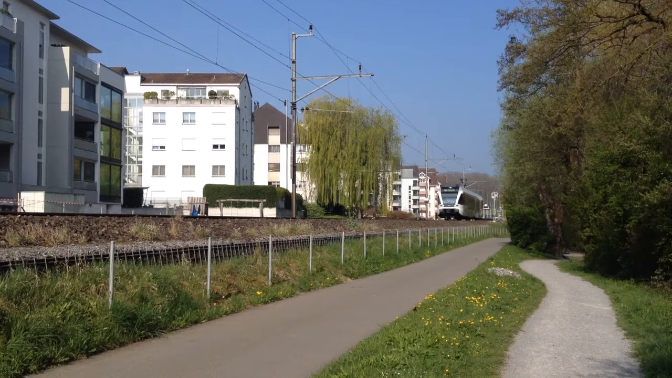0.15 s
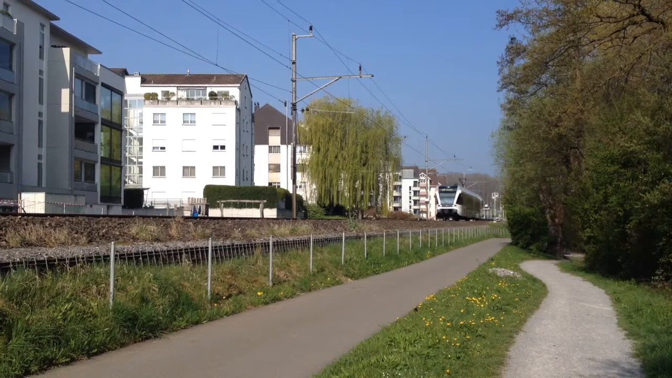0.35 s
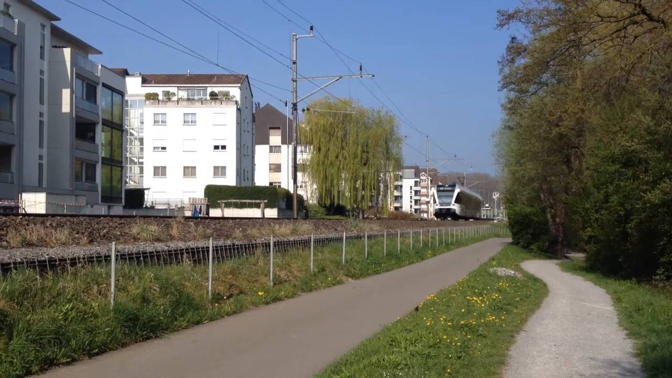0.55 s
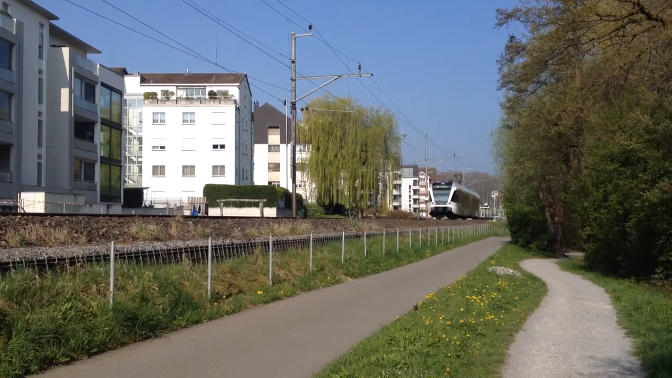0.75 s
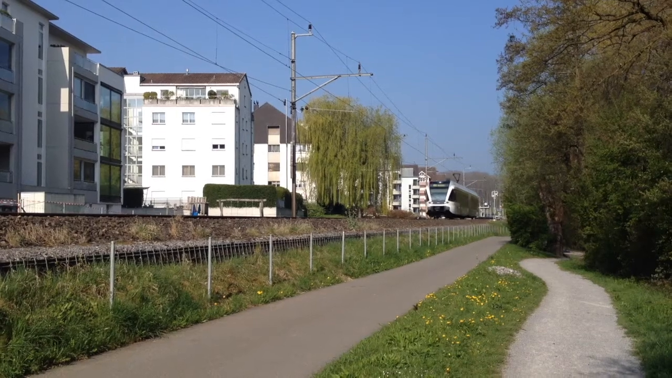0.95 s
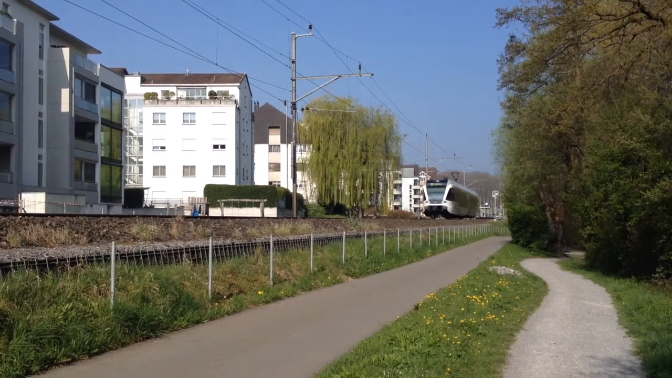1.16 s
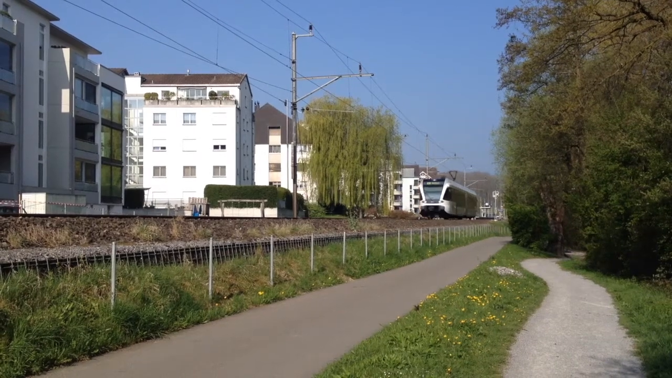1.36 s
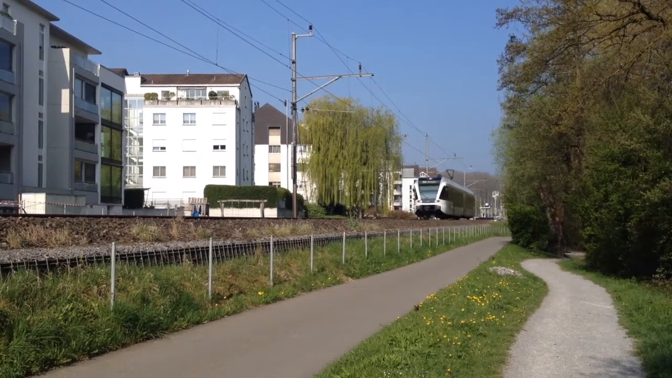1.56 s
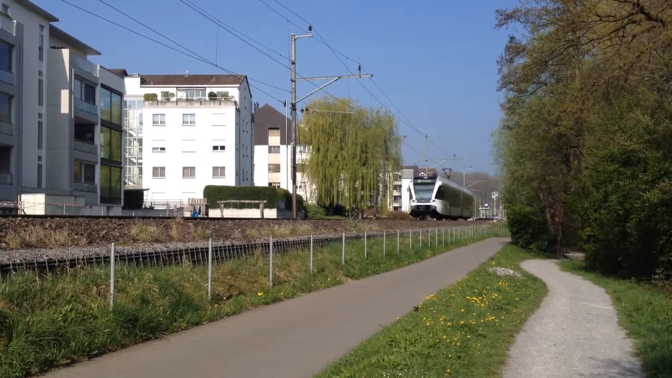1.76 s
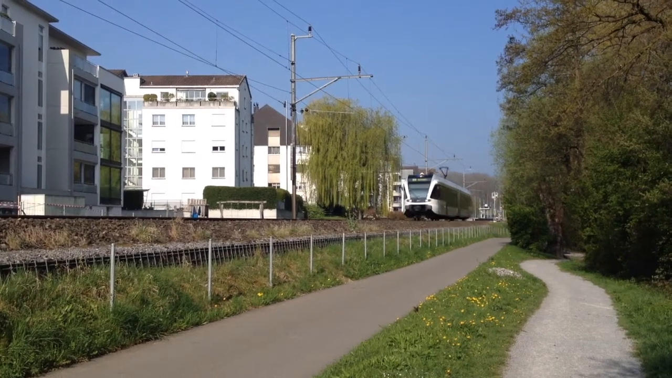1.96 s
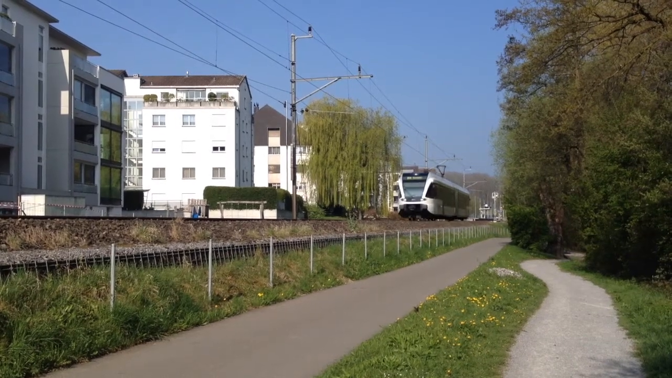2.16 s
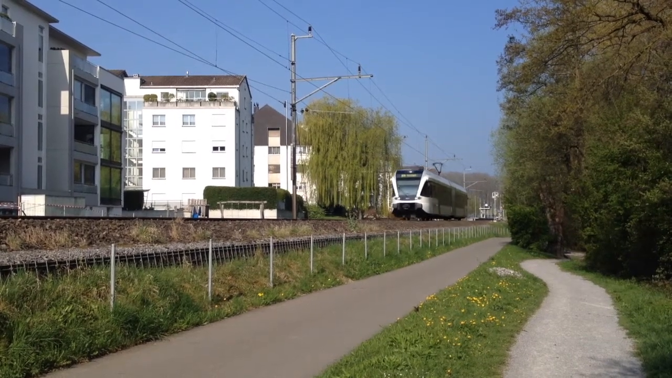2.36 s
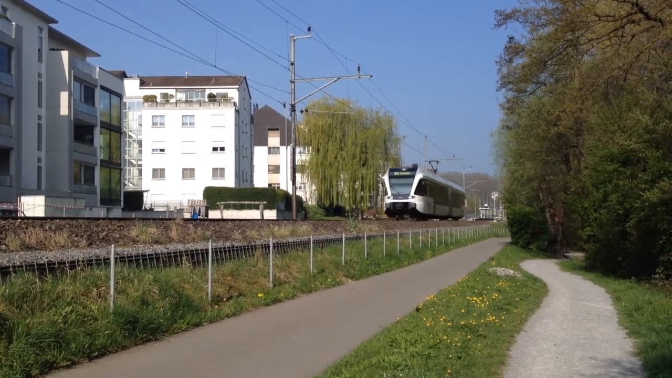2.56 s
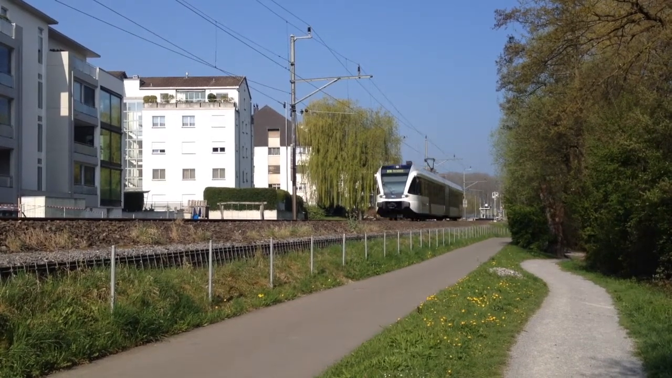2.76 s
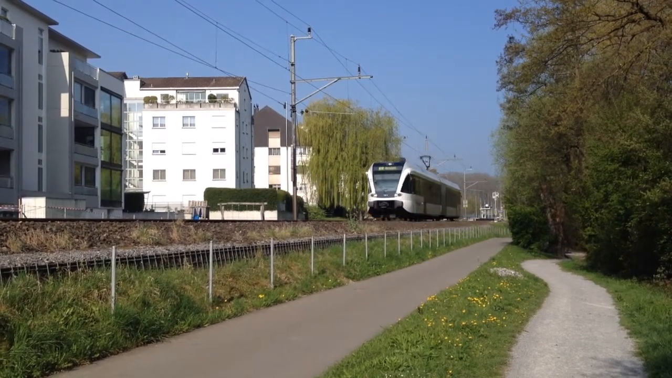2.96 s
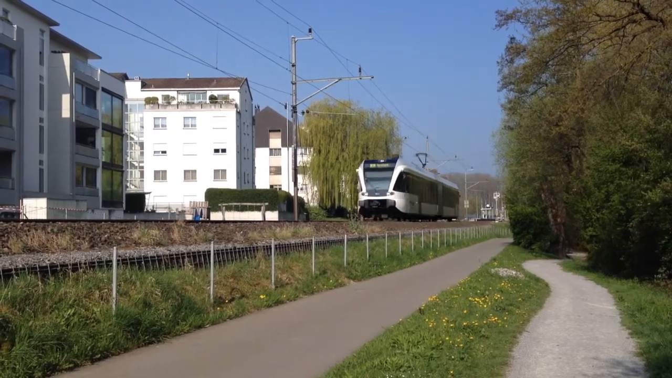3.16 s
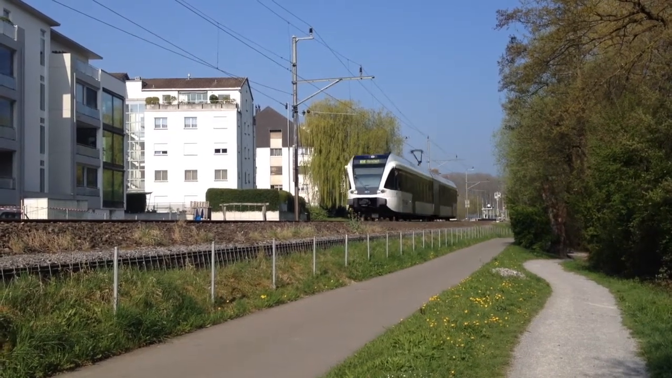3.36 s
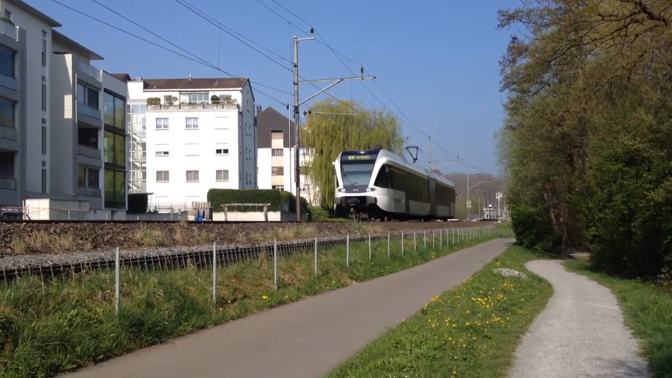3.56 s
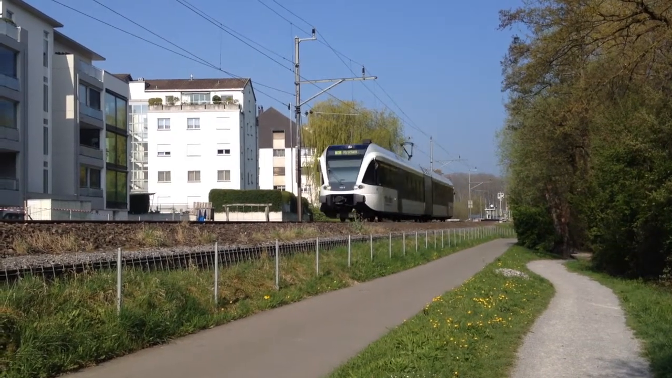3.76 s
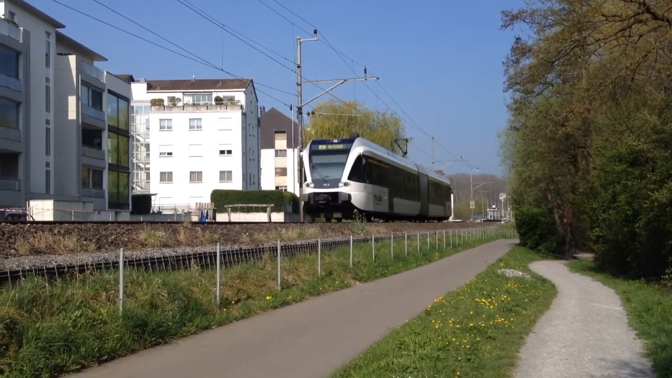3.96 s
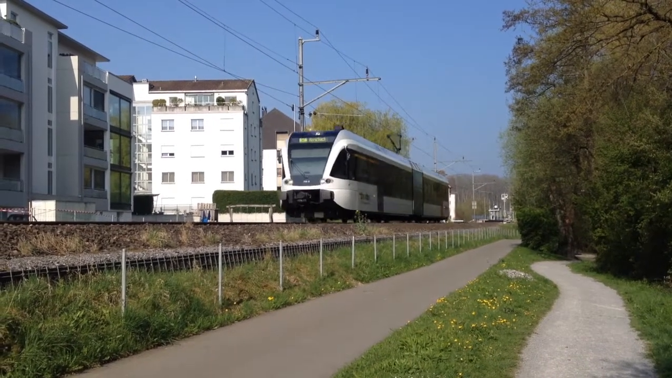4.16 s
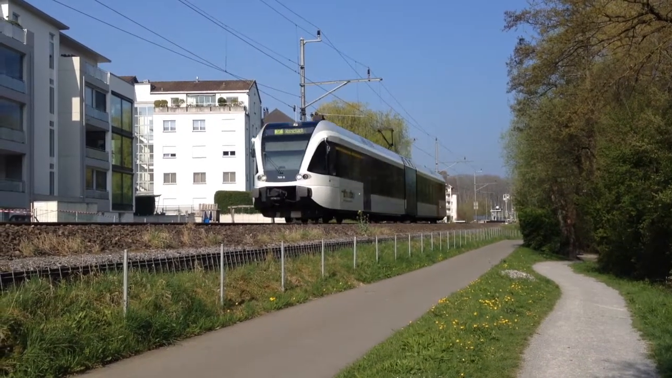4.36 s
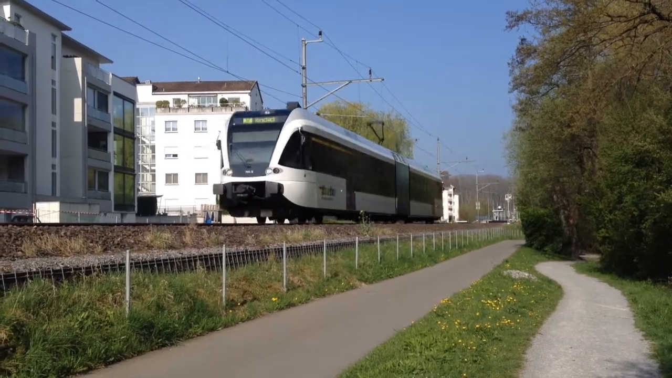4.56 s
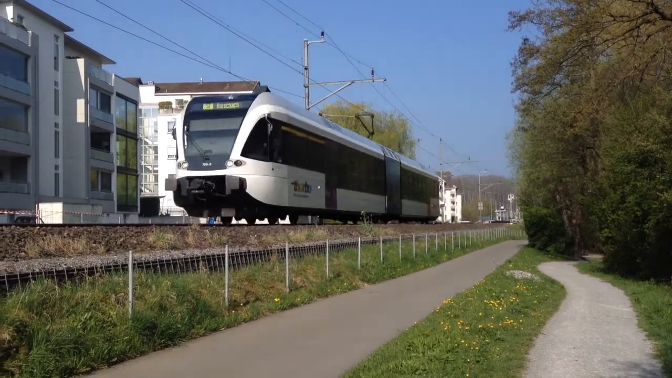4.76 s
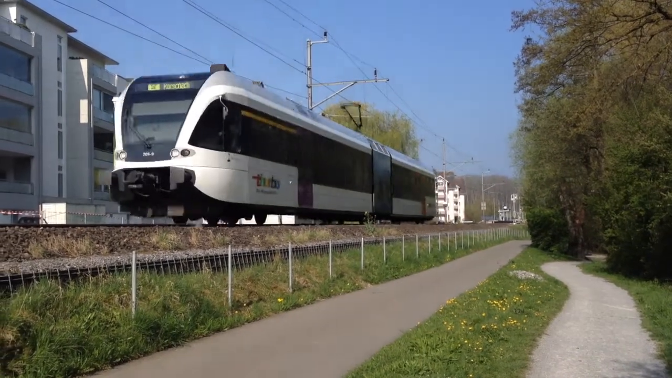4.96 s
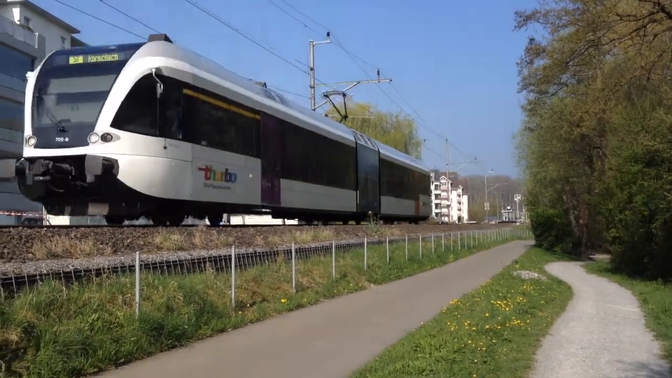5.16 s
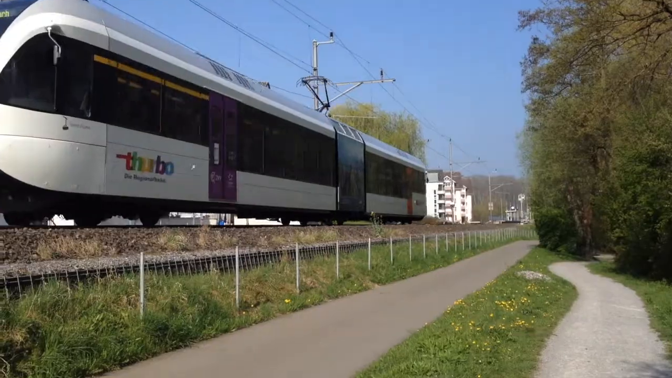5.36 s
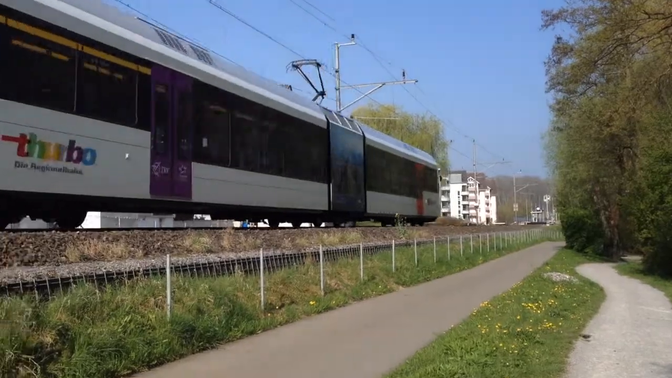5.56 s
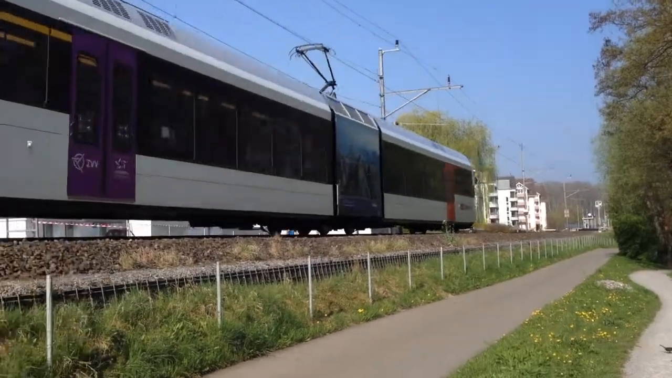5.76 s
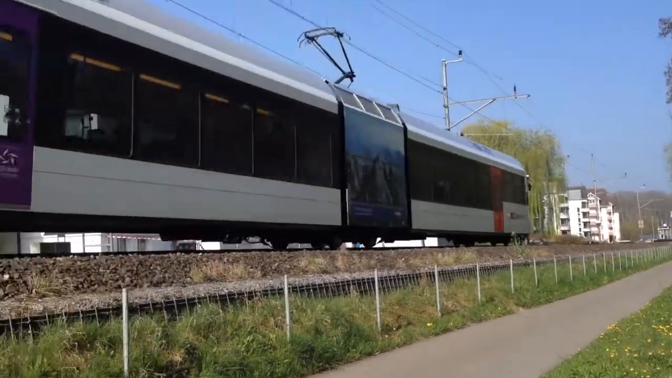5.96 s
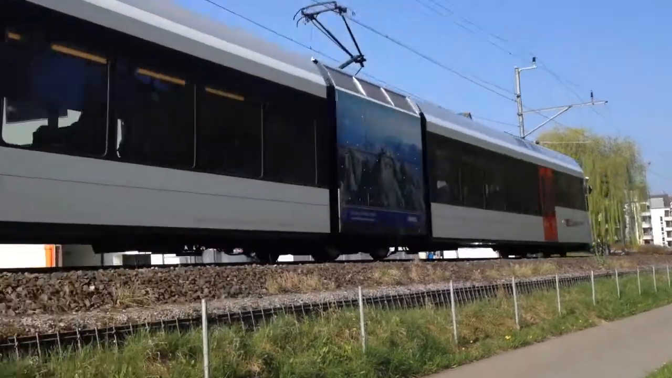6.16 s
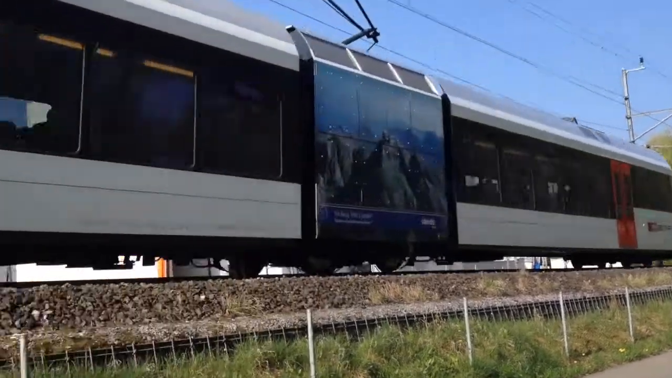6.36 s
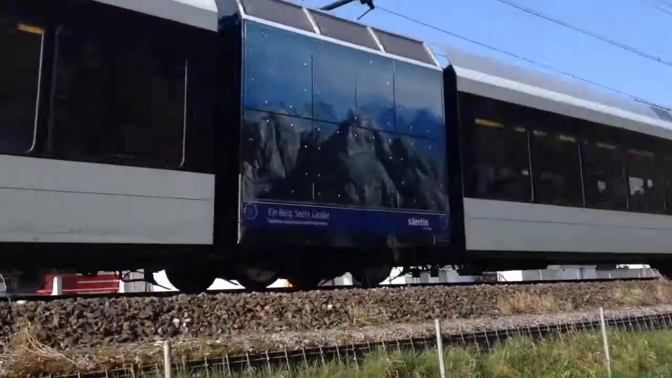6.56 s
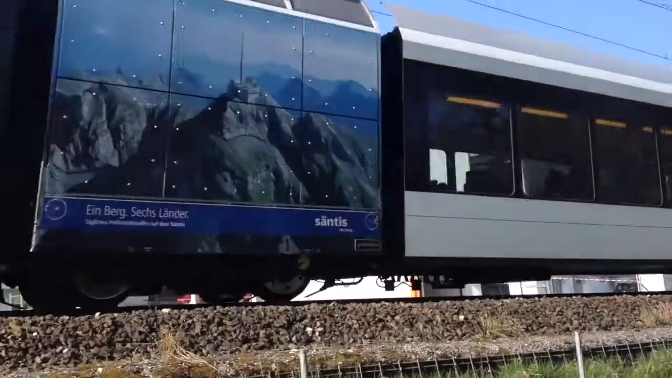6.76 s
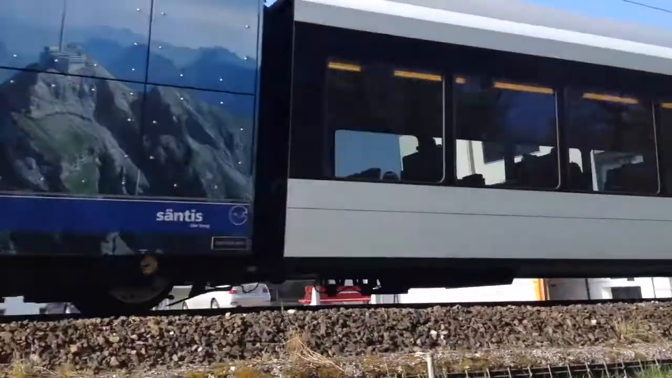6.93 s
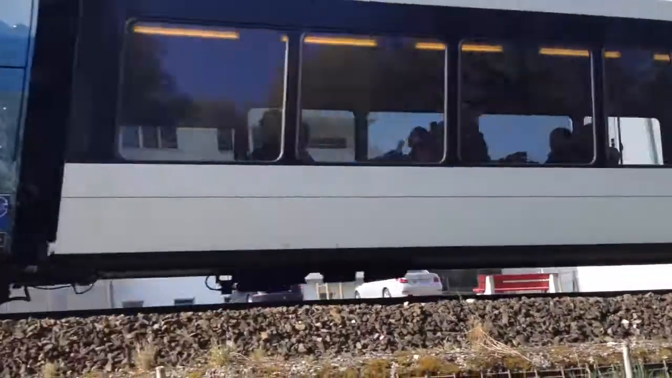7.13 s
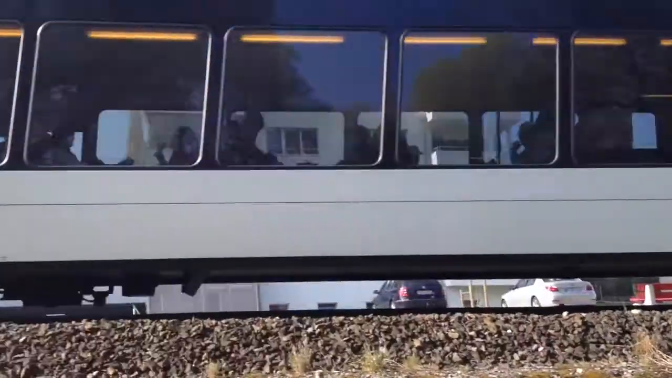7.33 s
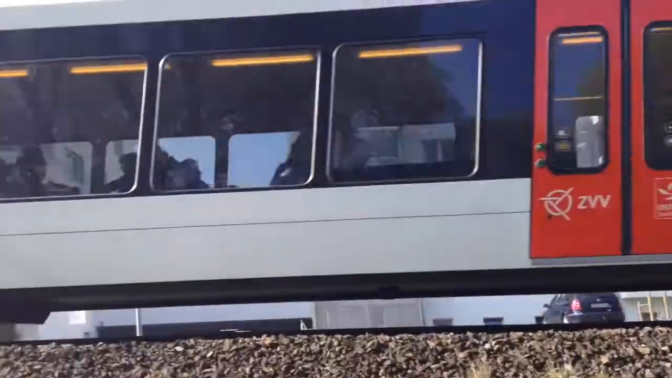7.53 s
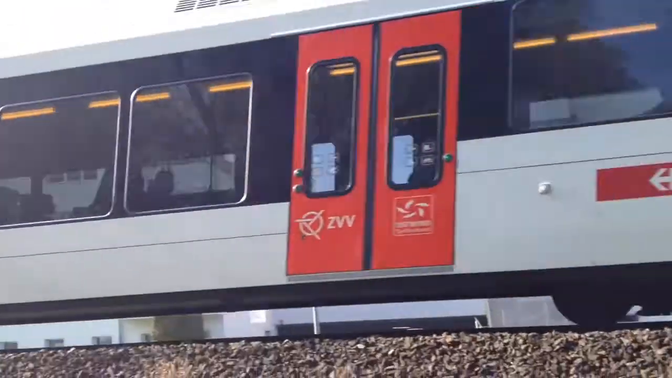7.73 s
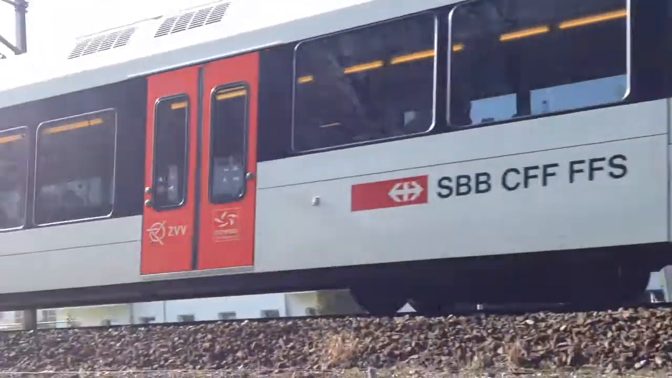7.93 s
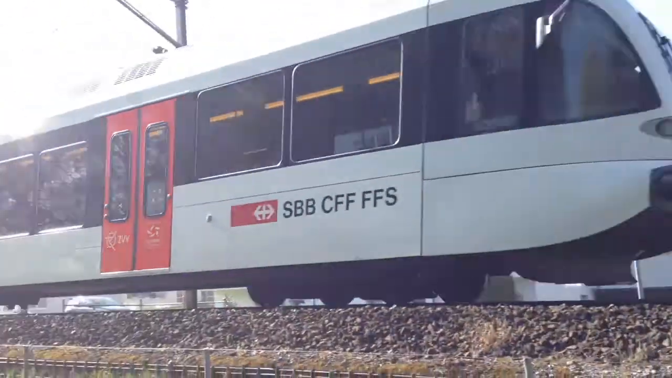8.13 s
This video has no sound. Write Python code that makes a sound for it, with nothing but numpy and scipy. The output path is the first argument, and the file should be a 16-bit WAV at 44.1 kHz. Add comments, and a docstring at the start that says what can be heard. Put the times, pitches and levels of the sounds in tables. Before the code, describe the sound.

A light electric railcar swells from a faint hiss to a close, ringing steel-on-rail roar as small birds chirp before it arrives.

```python
"""An electric railcar nears and rolls past a few metres away; small birds call over a faint town hush.
Roar is coloured noise in flickering bands plus track resonances; wheels ring in narrow Doppler-shifted modes.
Motor and gear tones follow a mostly rising pitch curve; a rail joint knocks; squeaks and birds are gliding notes.
Both channels carry the same mono sound."""
import sys
import numpy as np
from scipy import signal
from scipy.fft import rfft, irfft, next_fast_len
from scipy.io import wavfile
from scipy.ndimage import uniform_filter1d

SR = 44100
rng = np.random.default_rng(int(sys.argv[2]) if len(sys.argv) > 2 else 0)


def master_out(mix):
    """Clip the mix to full scale and print it as 16-bit PCM to the path in sys.argv[1]."""
    frames = np.transpose(np.atleast_2d(mix))
    ceiling = np.clip(frames, -1, 1)
    pcm = np.round(ceiling * 32767).astype(np.int16)
    wavfile.write(sys.argv[1], SR, pcm)


N = 365740
TIME = np.arange(N) / SR
SPEED_MS, TRACK_M, SOUND_MS = 17.5, 7.5, 343  # constant passing speed, distance at the nearest point
NOSE_S, NOSE_RISE_S = 5.6, 0.412  # the nose comes abreast
RING_SINK_PER_S = 0.0396  # pitch share lost per second of ring once close

# nominal rolling roar: [t/s, level/dB in 1700-9000 Hz, relative body/dB, relative rumble/dB]
ROAR_CURVE = [(.1, -65, -3, -4), (.5, -65.5, -1.5, -6), (1.2, -62.5, -2, -3), (1.9, -60.5, 2.5, -1.5),
              (3, -57, 0.5, -1), (4, -51.5, 0, 2.5), (4.75, -45, -3.5, 3.5), (5.2, -41.5, -3, 4.5),
              (5.32, -41, -0.5, 5.5), (5.55, -37.5, -0.5, 4), (6.03, -35.5, 1.5, 2), (6.5, -34, 2, -0.5),
              (7.1, -33.5, 2.5, -4), (7.35, -33.5, 1, 2), (7.6, -33.5, 0, 1), (7.75, -32.5, -1.5, 1.5),
              (8.05, -34, -1.5, 0), (8.29, -38, 2.5, 1)]
# spectral density of the roar: [f/Hz, relative level/dB per Hz]
ROAR_SPECTRUM = [(40, -29), (130, -4.5), (360, -9), (480, -5), (660, -4.5), (760, -10.5), (1000, -6.5),
                 (1800, -11.5), (2300, -8.5), (4500, -6.5), (5050, -13.5), (7200, -12.5), (8600, -23.5),
                 (15200, -50.5)]


def undb(db):
    """Decibels to amplitude gain."""
    return 10 ** (np.asarray(db) / 20)


def unit(x):
    """Scale to rms 1."""
    return x / np.sqrt(np.mean(x ** 2))


def columns(table):
    """Value columns of a time curve, interpolated at every sample."""
    s, *values = np.transpose(table)
    return [np.interp(TIME, s, value) for value in values]


def on_log_hz(hz, table_hz, table_db):
    """Level curve in dB, linear over log frequency."""
    return np.interp(np.log(hz), np.log(table_hz), table_db)


def highpass(x, hz):
    """Second-order Butterworth high-pass."""
    return signal.sosfilt(signal.butter(2, hz, "high", fs=SR, output="sos"), x)


def walk(rate_hz, size=N):
    """Random levels held 1 / rate_hz, smoothed by two moving averages; spread near 1."""
    hold = int(SR / rate_hz)
    steps = np.repeat(rng.standard_normal(size // hold + 1), hold)
    smooth = uniform_filter1d(uniform_filter1d(steps, hold), hold)
    return 1.35 * smooth[:size]


def sine(hz):
    """Clean tone on the pitch track hz; rms 1."""
    return np.sqrt(2) * np.sin(2 * np.pi * np.cumsum(hz) / SR)


def hum(hz, width_hz):
    """Narrow-band noise on the pitch track hz: size and phase wander over width_hz; rms near 1."""
    phase = 2 * np.pi * np.cumsum(hz) / SR
    in_phase = walk(2 * width_hz, size=len(hz)) * np.cos(phase)
    return in_phase + walk(2 * width_hz, size=len(hz)) * np.sin(phase)


def ring(hz, rough):
    """A smooth ring holds a clean tone; a rough one spreads into a wavering cluster."""
    clean = np.sqrt(max(1 - rough ** 2, 0)) * sine(hz)
    return clean + rough * hum(hz, 10 + .025 * hz[0] * rough ** 2)


def thirds(spectrum):
    """Coloured noise, rms 1 over 1700-9000 Hz, in overlapping third-octave bands: (centre Hz, band)."""
    size = next_fast_len(N)
    hz = np.maximum(np.arange(size // 2 + 1) * SR / size, 1)
    shape = undb(on_log_hz(hz, *np.transpose(spectrum)))
    shape = shape / np.sqrt(np.mean(shape ** 2 * (hz > 1700) * (hz < 9000)))
    noise = rfft(rng.standard_normal(size)) * shape
    for centre_oct in np.arange(np.log2(25), np.log2(18000), 1 / 3):
        window = np.clip(1 - 3 * abs(np.log2(hz) - centre_oct), 0, 1)
        yield 2 ** centre_oct, irfft(noise * window, size)[:N]


def notes(table, tone, hook=0, late=1, arch=1):
    """Gliding notes under an arch; share hook of the glide falls mostly at the end, late > 1 delays the peak."""
    out = np.zeros(N)
    for s, length_s, start_hz, end_hz, db, *more in table:
        start = int(s * SR)
        u = np.linspace(0, 1, int(length_s * SR))[:N - start]
        glide = (1 - hook) * u ** 1.298 + hook * u ** 6
        hz = start_hz + (end_hz - start_hz) * glide
        envelope = abs(np.sin(np.pi * u ** late)) ** arch
        out[start:][:len(u)] += undb(db) * envelope * tone(hz, *more)
    return out


def closeness(s):
    """Sigmoid over time: 0 while the train is far, 1 once it is close."""
    return 1 / (1 + np.exp((NOSE_S - s) / NOSE_RISE_S))


def passing(ahead_m):
    """Nearness (1 abreast) and Doppler factor of a source ahead_m up the track."""
    distance_m = np.hypot(ahead_m, TRACK_M)
    return TRACK_M / distance_m, 1 / (1 - SPEED_MS / SOUND_MS * ahead_m / distance_m)


def town():
    """Distant traffic and leaves: noise bands that swell and flicker, ever less above 6 kHz."""
    # spectral density: [f/Hz, relative level/dB per Hz]
    hush_spectrum = [(40, -8), (100, -3.5), (220, 2.5), (330, 0), (600, -0.5), (1200, -1.5), (1800, -9.5),
                     (2200, -3.5), (4400, -13), (5000, -30), (8200, -21), (9500, -32.5), (15200, -21.5)]
    swell_db, hush = 0.69 * walk(2.7), 0
    for hz, band in thirds(hush_spectrum):
        hush = hush + band * undb((swell_db + 1.3 * walk(8.0)) * min(6000 / hz, 1) ** 2)
    return undb(-63) * unit(hush)


def birds():
    """Whistled notes, each a gliding tone, with diffuse scatter from trees and echoes from house fronts."""
    # falling notes of a bird nearby: [t/s, start f/Hz, level/dB]
    song = [(1.738, 8570, -54.5), (1.84, 8650, -53.5), (1.948, 8100, -52), (2.065, 7530, -51),
            (2.19, 7450, -52.5), (2.32, 7400, -54.5)]
    # soft notes of birds further off: [t/s, length/s, start f/Hz, end f/Hz, level/dB]
    far_calls = [(.075, 0.13, 4030, 4100, -64.5), (.12, .07, 4140, 4170, -63),
                 (.245, 0.039, 4030, 4200, -70), (.29, .07, 4200, 4280, -68),
                 (2.445, 0.02, 4300, 4900, -63), (2.465, .022, 4500, 4050, -66),
                 (2.98, 0.06, 4340, 4200, -60), (2.98, 0.24, 7300, 7070, -72),
                 (3.183, 0.026, 4150, 4950, -60), (3.208, .016, 4700, 4050, -61),
                 (3.365, 0.05, 4260, 4226, -55.5), (3.75, 0.058, 4220, 4130, -56),
                 (4.145, 0.046, 4200, 4220, -55), (4.33, .12, 7560, 7600, -74)]
    # house fronts: [delay/s, level/dB]
    house_fronts = [(.026, -35), (.047, -20)]
    note_s, end_hz = 0.049, 5430
    trees_t60_s, trees_rise_s, trees_db = 0.55, 0.0057, -4
    song_notes = [(s, note_s, hz, end_hz, db) for s, hz, db in song]
    direct = notes(song_notes, sine, hook=0.265, late=2.2, arch=0.63)
    direct = direct + notes(far_calls, lambda hz: 0.93 * sine(hz) + .2 * hum(hz, 74), arch=0.33)
    t = TIME[:SR // 2]
    scatter = rng.standard_normal(len(t)) * 1000 ** (-t / trees_t60_s) * np.clip(t / trees_rise_s, 0, 1)
    scatter = scatter / np.sqrt(np.sum(scatter ** 2))
    echoed = sum(undb(db) * np.roll(direct, int(delay_s * SR)) for delay_s, db in house_fronts)
    return direct + echoed + undb(trees_db) * signal.fftconvolve(direct, scatter)[:N]


def drive():
    """Traction motor and gear tones with noisy skirts, and a cooling fan heard broadside, all Doppler-shifted."""
    # traction drive: [t/s, motor f/Hz at the source, motor level/dB, gear level/dB]
    drive_curve = [(.1, 995, -88, -72), (1.2, 1005, -88, -72), (2, 1113, -82, -68.5), (2.8, 1160, -79, -69),
                   (3.2, 1196, -73, -78), (4.2, 1284, -70, -82), (5, 1353, -62, -74), (5.5, 1413, -56, -61),
                   (6.1, 1453, -51, -58), (6.32, 1468, -43, -46), (6.58, 1484, -50, -52),
                   (6.75, 1492, -40, -49), (6.87, 1499, -41.5, -42), (6.98, 1510, -35, -47),
                   (7.08, 1517, -36.5, -46), (7.15, 1522, -42, -42), (7.3, 1535, -41.5, -40.5),
                   (7.52, 1550, -44, -47), (7.66, 1554, -48, -51), (7.9, 1568, -54, -43),
                   (8.1, 1567, -46, -52), (8.29, 1576, -59, -52)]
    gear_ratio, abreast_s = .6, 7.05
    fan_source_hz, fan_db, fan_s, fan_spread_s = 139.5, -45, 7.07, 0.15
    motor_hz, motor_db, gear_db = columns(drive_curve)
    _, doppler = passing(SPEED_MS * (abreast_s - TIME))
    motor_hz, fan_hz = motor_hz * doppler, fan_source_hz * doppler
    gear_hz = gear_ratio * motor_hz
    motor = 0.9 * sine(motor_hz) + 0.29 * hum(motor_hz, 25) + 0.65 * hum(motor_hz, 90)
    motor = undb(motor_db + 1.0 * walk(12)) * motor
    gears = undb(gear_db + 1.9 * walk(8.9)) * (0.62 * sine(gear_hz) + 0.48 * hum(gear_hz, 30))
    fan_level = undb(fan_db) * np.exp(-.5 * ((TIME - fan_s) / fan_spread_s) ** 2)
    return motor + gears + fan_level * (sine(fan_hz) + 0.34 * hum(fan_hz, 6))


def squeaks():
    """Short clean tones that fall in pitch, part of the drop at the very end."""
    # [t/s, length/s, start f/Hz, end f/Hz, level/dB]
    squeak_notes = [(7.364, 0.028, 6500, 5400, -47), (7.704, 0.024, 6250, 5400, -35.5),
                    (8.055, 0.026, 6080, 5400, -39)]
    return notes(squeak_notes, sine, hook=0.24)


def knocks():
    """Wheels strike a rail joint: short modes and a brief fastening rattle; longer contact dulls the blow."""
    # blows: [t/s, level/dB, contact time/s]
    joint_blows = [(5.8518, -14, .00012), (5.8627, -14.5, .00012), (7.8955, -18.5, .0004),
                   (7.905, -16.5, .0004), (7.912, -17, .0006), (7.9185, -13.5, .0005),
                   (7.9232, -14.5, .0005)]
    # modes of wheel and rail: [f/Hz, relative level/dB, t60/s]
    knock_modes = [(1360, 9, 0.0034), (2920, 11.5, 0.0036), (900, -10, 0.02), (1740, 2, .005),
                   (5000, -4, .003)]
    rattle_band_hz, rattle_db, rattle_t60_s = (603, 2200), -17.5, 0.055
    t = TIME[:SR // 8]
    blow = sum(undb(db) * np.sin(2 * np.pi * hz * t) * 1000 ** (-t / t60_s) for hz, db, t60_s in knock_modes)
    blow = blow / abs(blow).max()
    band = signal.butter(2, rattle_band_hz, "band", fs=SR, output="sos")
    out = np.zeros(N)
    for s, db, contact_s in joint_blows:
        rattle = unit(signal.sosfilt(band, rng.standard_normal(len(t))))
        sound = blow + undb(rattle_db) * rattle * 1000 ** (-t / rattle_t60_s)
        push = np.hanning(int(contact_s * SR) + 2)
        out[int(s * SR):][:len(t)] += undb(db) * np.convolve(sound, push / push.sum())[:len(t)]
    return highpass(out, 550)  # so short a blow radiates little bass


def glints():
    """Many chance wheel and rail modes ring briefly, spread evenly in log pitch, scaled by the roar level."""
    count, low_hz, high_hz = 520, 1000, 7515
    shortest_s, longest_s = .06, 0.221
    level_db, scatter_db = -18.5, 2.5  # against the roar
    when, pitch, stretch, size = rng.random((count, 4)).T
    s = 3.5 + when * (TIME[-1] - 3.6)
    hz = low_hz * (high_hz / low_hz) ** pitch
    length_s = shortest_s + stretch * (longest_s - shortest_s)
    colour_hz, colour_db = np.transpose(ROAR_SPECTRUM)
    db = level_db + on_log_hz(hz, colour_hz, colour_db) - colour_db.max()
    db = db - scatter_db * np.log(1 - size)  # exponential scatter upward
    sunk_hz = hz * (1 - RING_SINK_PER_S * length_s * closeness(s))
    rung = notes(zip(s, length_s, hz, sunk_hz, db), lambda hz: hum(hz, 14.1))
    return undb(columns(ROAR_CURVE)[0]) * rung


def wheels(surge_db):
    """Wheelsets ring in shared modes, Doppler-shifted and fading with distance; single modes swell into rings."""
    # bogies: [t abreast/s, relative level/dB]
    bogies = [(6.25, -10.5), (7.1, -12.5), (7.95, -9.5)]
    # modes at rest, before the bogie level: [f/Hz, width/Hz, broadside level/dB, level thrown ahead/dB]
    wheel_modes = [(2180, 30, -49.5, -36), (2576, 40, -40, -61), (2770, 40, -68, -35),
                   (3070, 45, -42.5, -55), (3568, 60, -39, -31.5), (4226, 80, -41.5, -31),
                   (4920, 60, -41, -50), (5580, 83, -46.5, -76), (6360, 40, -45.5, -68)]
    # single modes of wheel or rail, and at 3.2 s a faint gear tone: [t/s, length/s, start f/Hz, level/dB,
    # roughness 0-1]
    swelling_modes = [(3.2, 1, 758, -69, 0.57), (4.5, 1.46, 3800, -49, 0.68), (4.65, 0.57, 4430, -46, 0.9),
                      (5.58, 0.16, 3790, -43.5, 0.49), (4.8, 0.74, 2874, -52.5, 0.77),
                      (5.31, 0.36, 2296, -43, 0.22), (5.35, 0.57, 4400, -47, 0.9),
                      (5.9, 0.23, 5000, -42.5, 0.63), (5.899, .35, 4324, -38, 0.96),
                      (5.947, 0.56, 2600, -45.5, 0.5), (6.35, 0.37, 463, -43, 0.53),
                      (6.93, .48, 457.4, -42, .45), (6.3, 0.34, 4180, -41.5, .8),
                      (6.6, 0.46, 4140, -47, 0.64), (6.0, 0.56, 3500, -53, 0.66),
                      (6.0, 0.59, 3110, -58, 0.7), (6.15, 0.26, 2025, -50, 0.64),
                      (6.35, 0.17, 2260, -47, 0.56), (6.33, .18, 3060, -46, .5), (6.43, .3, 3530, -47, 0.5),
                      (6.55, .13, 2490, -45, .5), (6.6, 0.19, 2270, -46.5, 0.54),
                      (6.72, .3, 4400, -46.5, 0.47), (7.08, 0.15, 2580, -44.5, 0.5),
                      (7.42, .13, 3620, -45, .5), (6.65, .14, 2970, -46.5, 0.56),
                      (6.8, 0.29, 890, -43.5, 0.38), (6.949, 0.11, 2140, -40, 0.4),
                      (7.05, 0.18, 3810, -43, 0.57), (7.251, 0.45, 3175, -45.5, 0.65),
                      (7.61, 0.16, 3120, -40, 0.55), (7.78, .19, 3080, -41, .55),
                      (7.6, 0.38, 3670, -38, 0.7), (7.65, 0.3, 3520, -39, 0.75),
                      (7.72, .25, 3590, -42.5, .6), (7.62, .2, 4340, -41, .7),
                      (7.72, 0.33, 4230, -40.5, 0.65), (7.65, .45, 854, -46.5, 0.4),
                      (7.7, 0.29, 2700, -44, 0.59), (7.75, .4, 2950, -44.5, 0.83),
                      (7.62, .1, 6170, -48, .5), (7.63, 0.072, 5200, -49, .6), (7.77, .05, 4500, -46, 0.58),
                      (7.871, 0.14, 6090, -49, 0.7), (7.9, .07, 4700, -45, .6), (7.905, .05, 8000, -47, .5),
                      (7.93, .07, 6870, -50, .6), (8.02, .045, 6060, -44, .4), (8.13, .16, 5930, -51, .7),
                      (7.95, 0.3, 3540, -41, 1), (8.027, 0.22, 3390, -47, 0.6),
                      (8.099, .19, 4130, -40.5, 0.78), (8.0, 0.11, 4100, -37, 0.69),
                      (8.026, 0.017, 4183, -25, 0.12), (8.048, 0.014, 4176, -24.5, 0.06)]
    axle_gap_m, wear = 2.4, .008  # wear: pitch share between the two wheelsets of a bogie
    step = 16  # samples per geometry update
    out = 0
    for abreast_s, bogie_db in bogies:
        for side in (-.5, .5):
            ahead_m = (SPEED_MS * (abreast_s - TIME) + side * axle_gap_m)[::step]
            near, doppler = passing(ahead_m)
            doppler = np.repeat(doppler, step)[:N]
            for hz, width_hz, side_db, ahead_db in wheel_modes:
                broadside = undb(side_db) * near ** 3
                # ballast and grass soak up what runs far along the ground
                thrown = undb(ahead_db) * (ahead_m > 0) * (1 - near ** 2) * near ** 1.99
                level = undb(bogie_db) * np.repeat(broadside + thrown, step)[:N]
                mode = hum(hz * (1 + side * wear) * doppler, width_hz)
                out = out + level * undb(1.8 * walk(12)) * mode
    rings = []
    for s, length_s, hz, db, rough in swelling_modes:
        sunk_hz = hz * (1 - RING_SINK_PER_S * length_s * closeness(s))
        rings.append((s, length_s, hz, sunk_hz, db, rough))
    return undb(surge_db) * out + notes(rings, ring, arch=0.77)


def roar():
    """Rough wheels on rough rails: noise bands surge together and flicker alone, track modes resonate."""
    # broad resonances of rail and sleepers: [f/Hz, width/Hz, level against the roar/dB]
    track_modes = [(199, 60, -21.5), (465.5, 80, -12.5), (567.4, 100, -14.5), (884.5, 120, -15.5),
                   (2263, 150, -25.5), (2873, 110, -22.5), (3635, 240, -24), (4327, 300, -13.5),
                   (6880, 350, -24)]
    # colour against the roar spectrum; air and grass dull the far train: [f/Hz, far level/dB, close level/dB]
    distance_colour = [(131, 5, -5.5), (274, 1.5, -1.5), (600, 0, 1.5), (1260, 2, 0), (3000, 0, 0.5),
                       (6160, -3, -1), (12000, -4, 7), (15000, 9, 16)]
    roar_db, body_db, rumble_db = columns(ROAR_CURVE)
    shift_hz, far_db, near_db = np.transpose(distance_colour)
    close = closeness(TIME)

    def tint_db(hz):
        """Colour over time at hz: distance, body full below 1500 Hz, rumble full below 150 Hz."""
        far, near = on_log_hz(hz, shift_hz, far_db), on_log_hz(hz, shift_hz, near_db)
        body = body_db * np.clip(np.log2(3000 / hz), 0, 1)
        rumble = rumble_db * np.clip(np.log2(300 / hz), 0, 1)
        return far + (near - far) * close + body + rumble

    surge_db = 0.39 * walk(6.4) + 0.61 * walk(18)
    rolling, track = 0, 0
    for hz, band in thirds(ROAR_SPECTRUM):
        rolling = rolling + band * undb(tint_db(hz) + surge_db * min(hz / 900, 1) + 1.0 * walk(9))
    for hz, width_hz, db in track_modes:
        low_tint_db = tint_db(600) if hz < 1000 else 0
        track = track + undb(db + low_tint_db + 1.8 * walk(4.067)) * hum(np.full(N, hz), width_hz)
    return undb(roar_db) * (undb(-3.5) * rolling + undb(surge_db) * track), surge_db


def scene():
    """Town, birds and railcar summed to mono, on two equal channels."""
    rolling, surge_db = roar()
    background = town() + birds()
    train = drive() + squeaks() + knocks() + glints() + wheels(surge_db) + rolling
    mono = background + train
    return np.array([mono, mono])


def record(dry):
    """Microphone bass cut, a short opening silence with a 10 ms fade-in, and a steep top cut."""
    low_cut_hz, start_s, top_hz = 82, .072, 15170
    thin = highpass(dry, low_cut_hz)
    opened = thin * np.clip((TIME - start_s) / 0.01, 0, 1)
    return signal.sosfilt(signal.ellip(12, .2, 80, top_hz, fs=SR, output="sos"), opened)


dry = scene()
out = record(dry)
master_out(out)
```